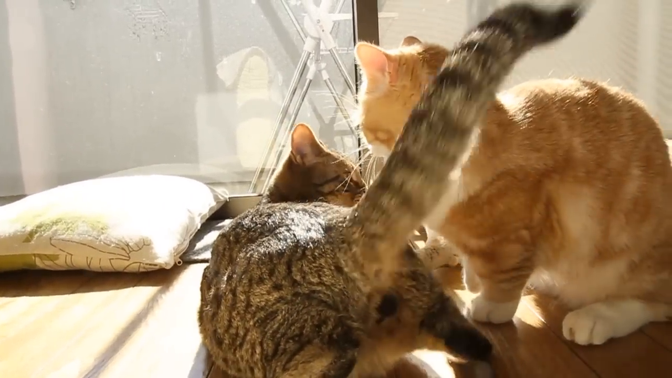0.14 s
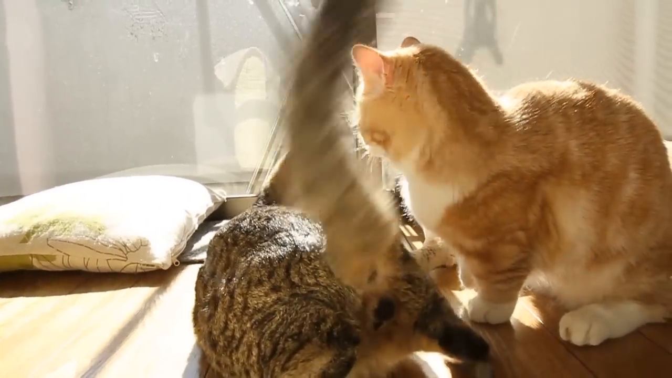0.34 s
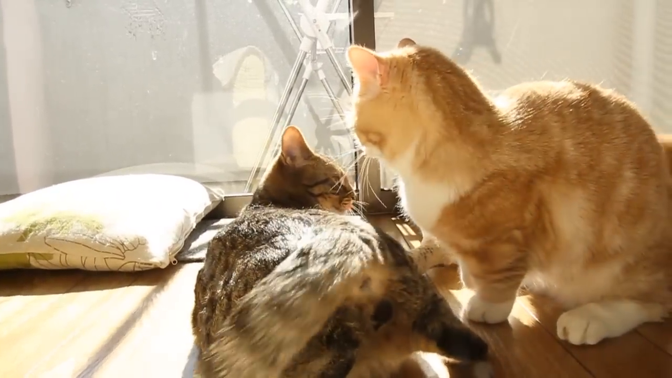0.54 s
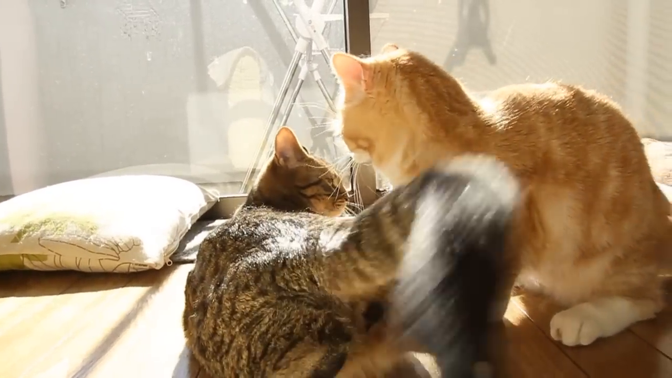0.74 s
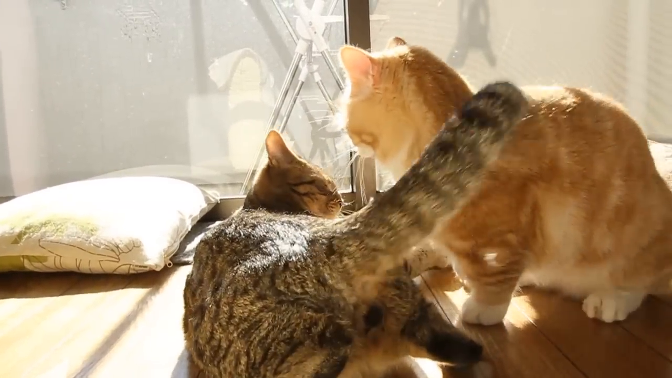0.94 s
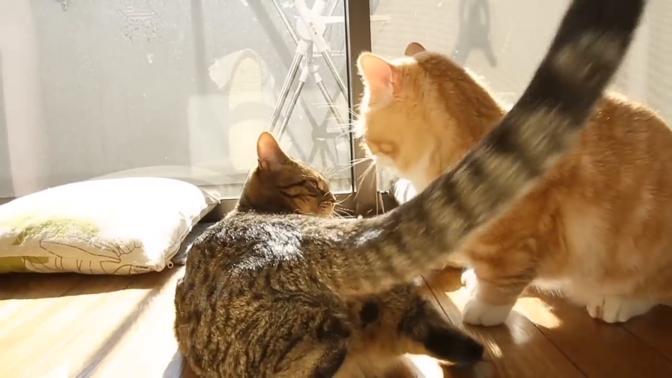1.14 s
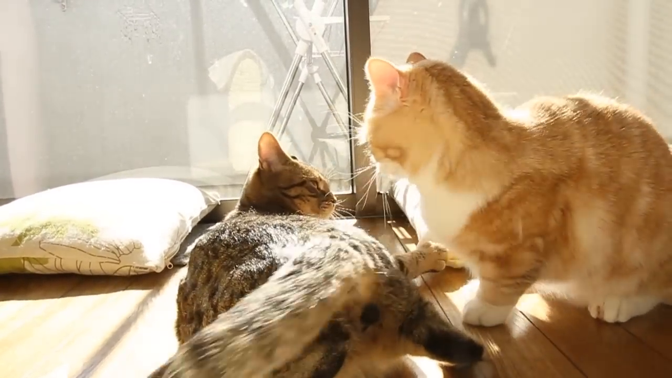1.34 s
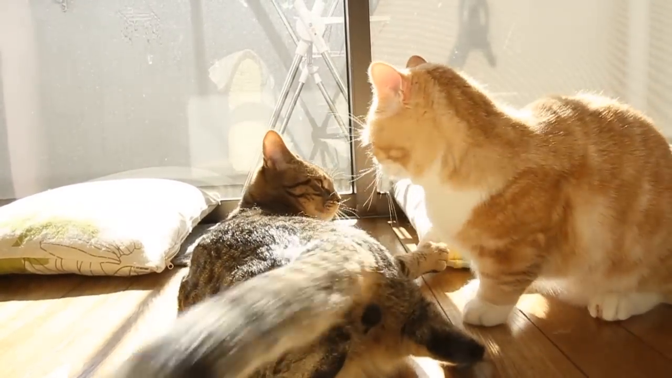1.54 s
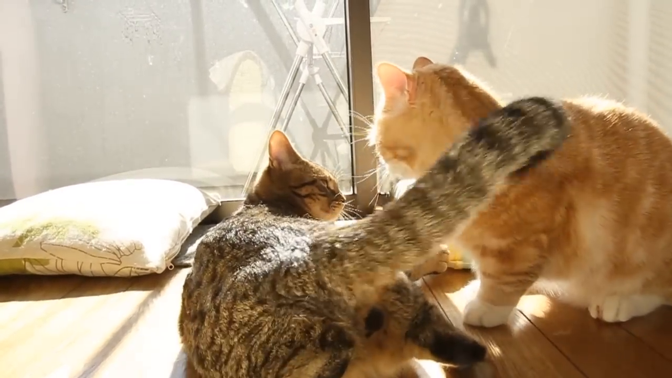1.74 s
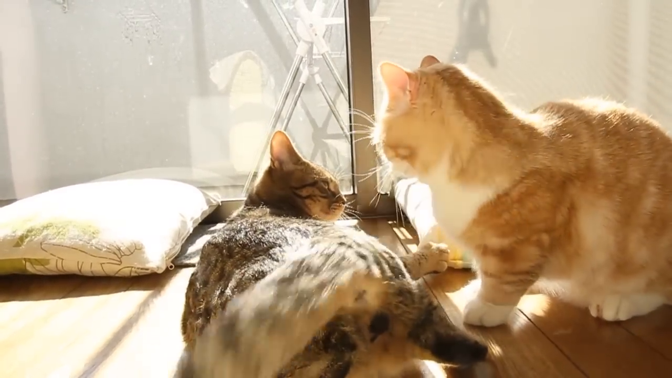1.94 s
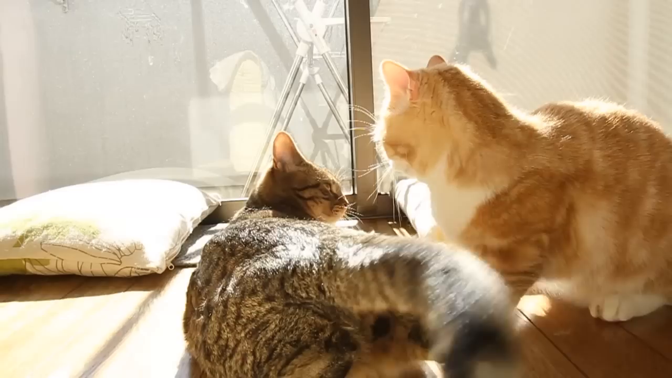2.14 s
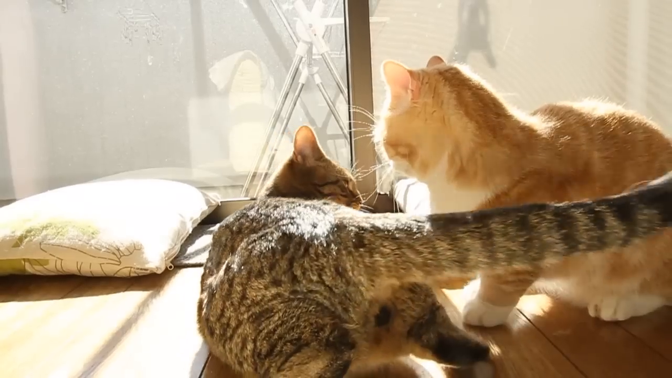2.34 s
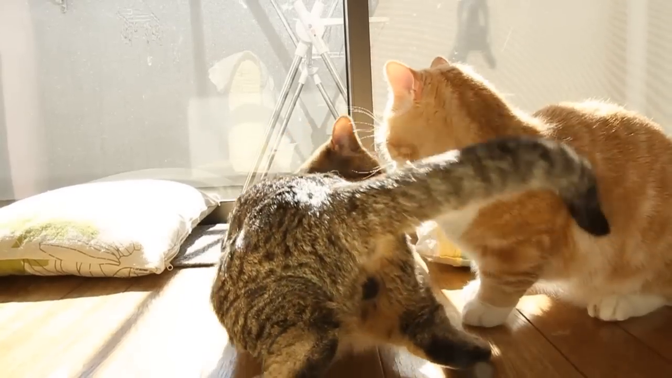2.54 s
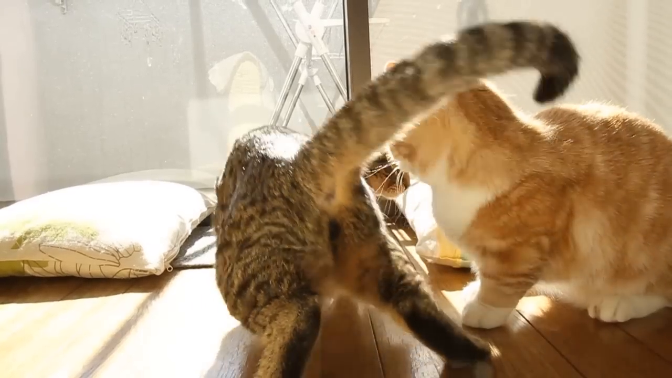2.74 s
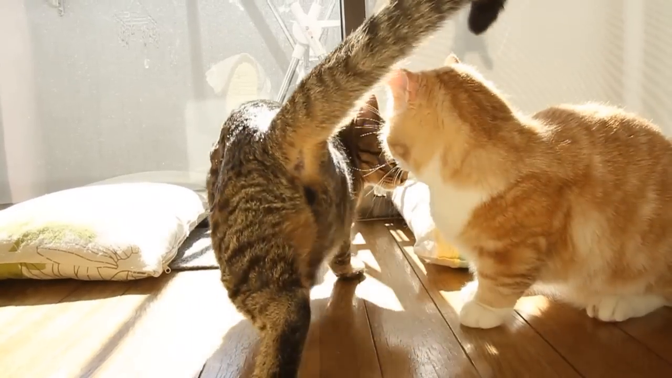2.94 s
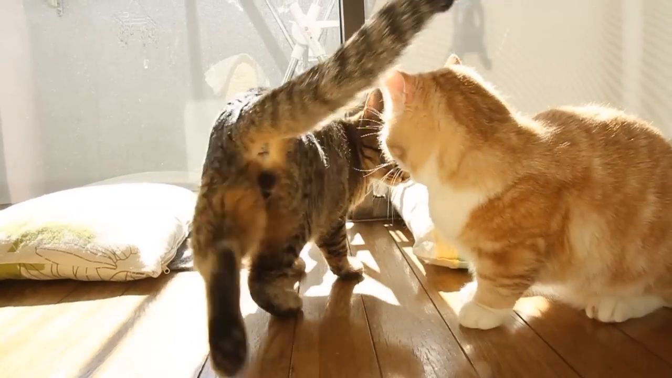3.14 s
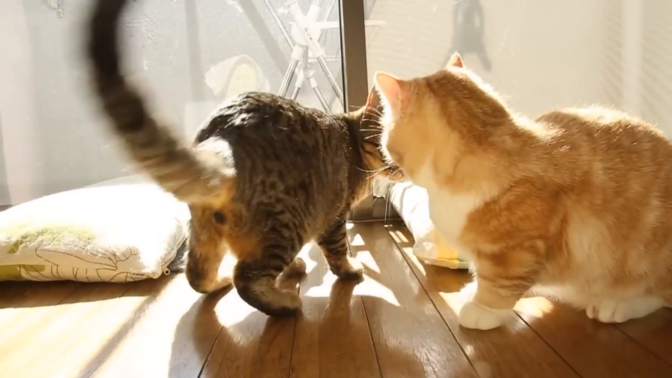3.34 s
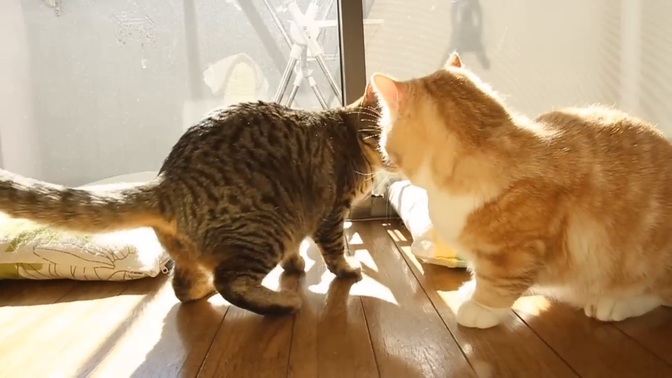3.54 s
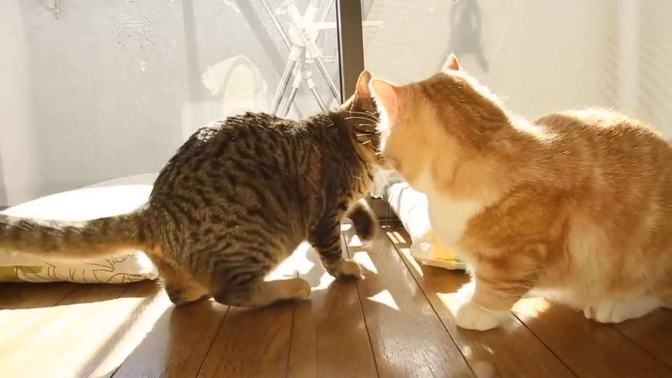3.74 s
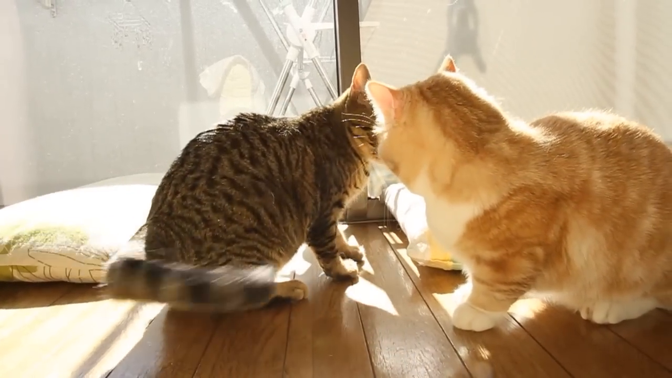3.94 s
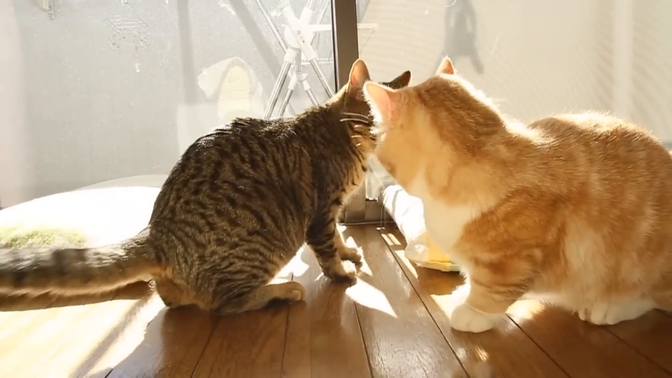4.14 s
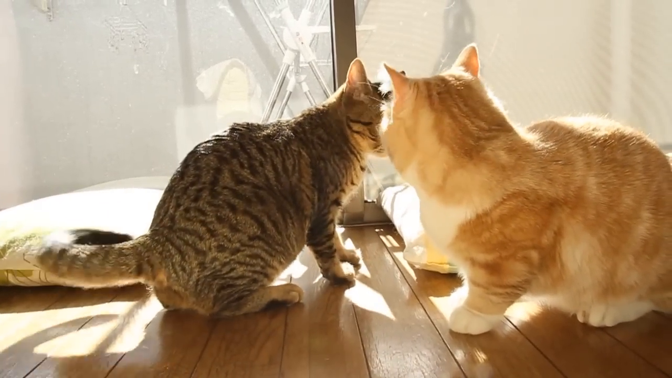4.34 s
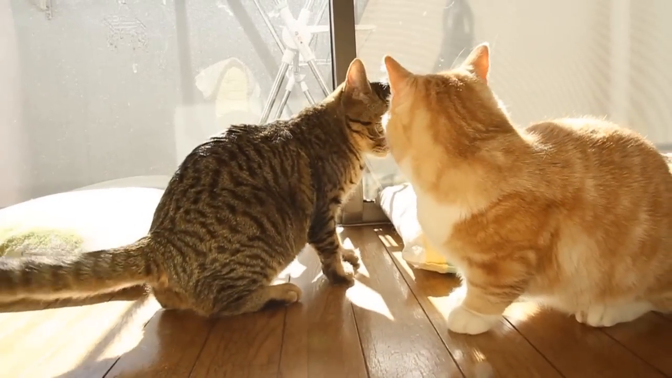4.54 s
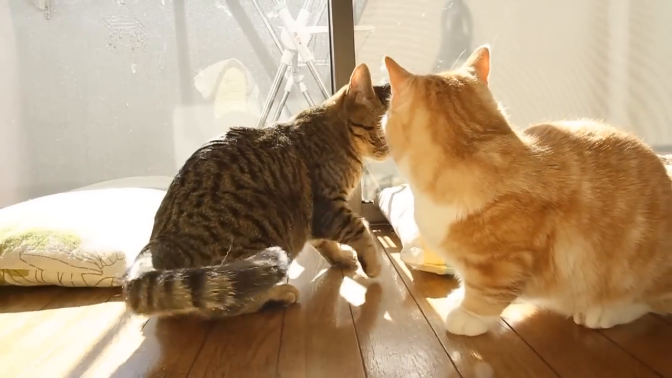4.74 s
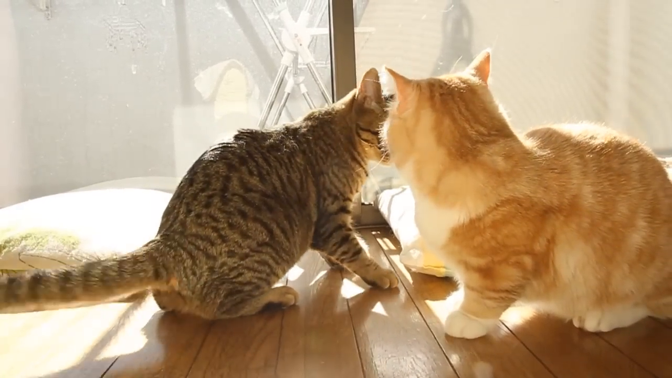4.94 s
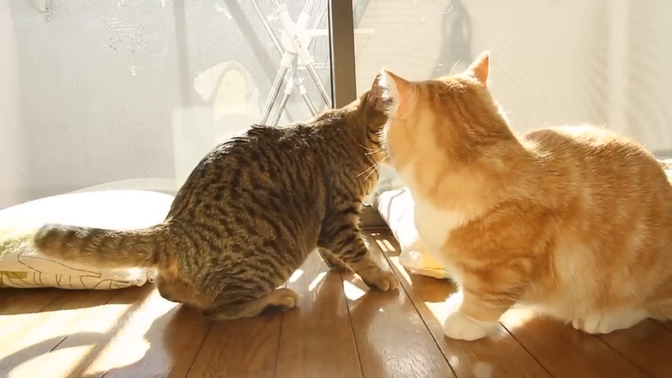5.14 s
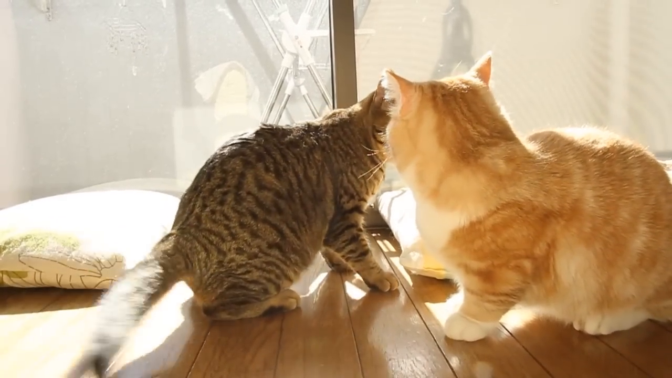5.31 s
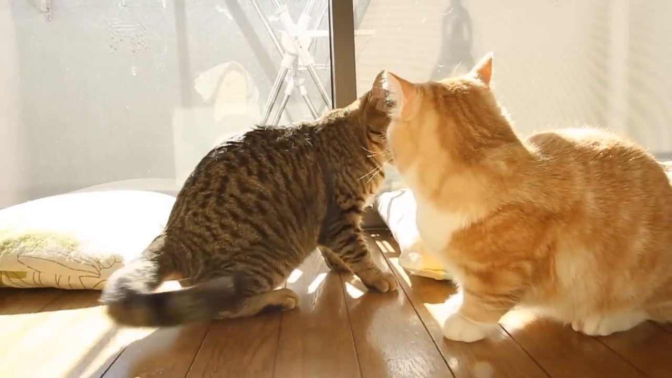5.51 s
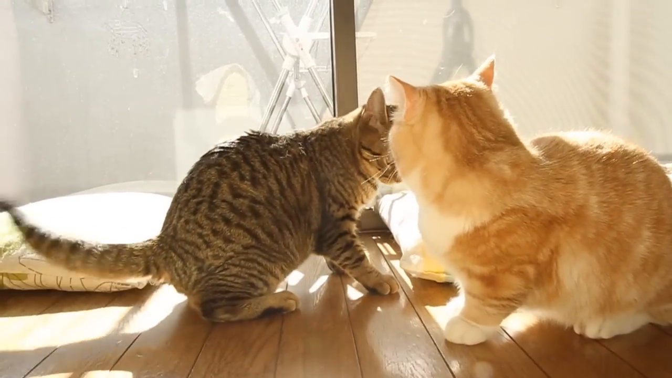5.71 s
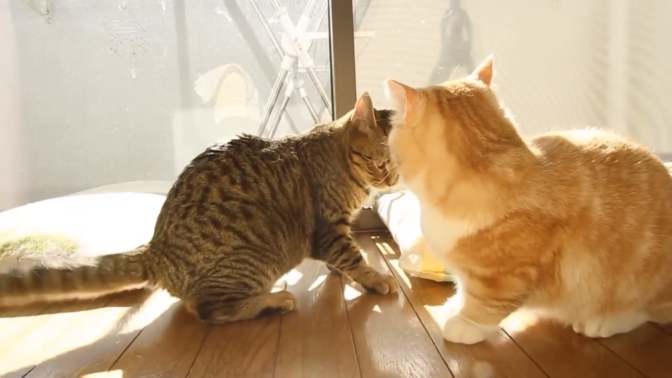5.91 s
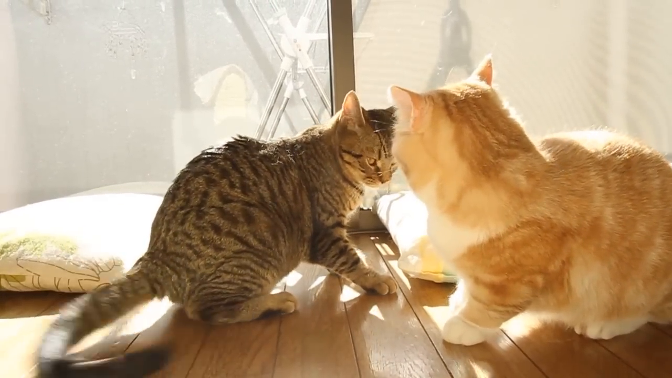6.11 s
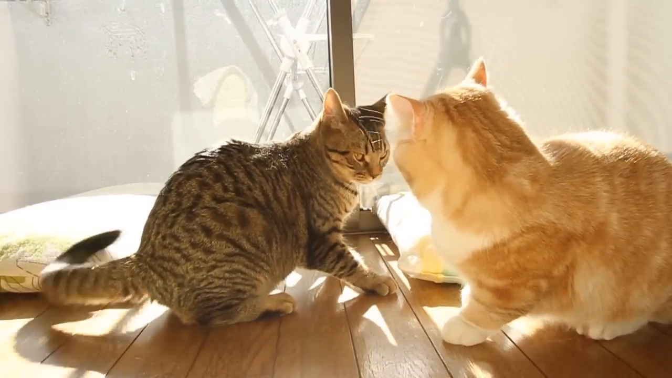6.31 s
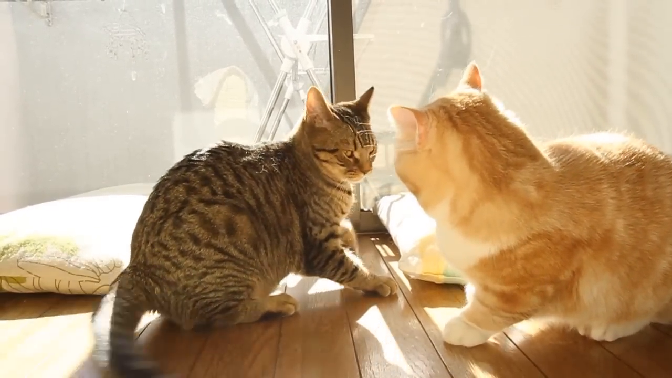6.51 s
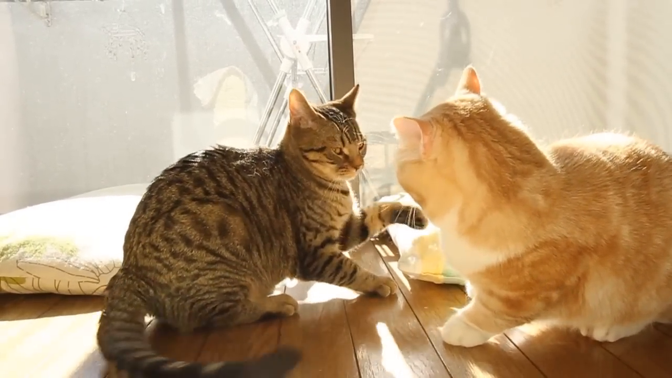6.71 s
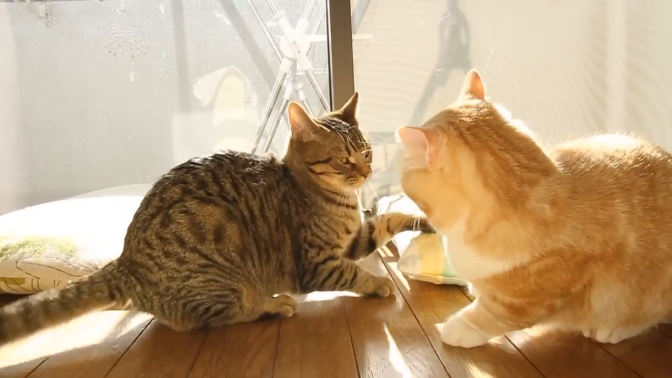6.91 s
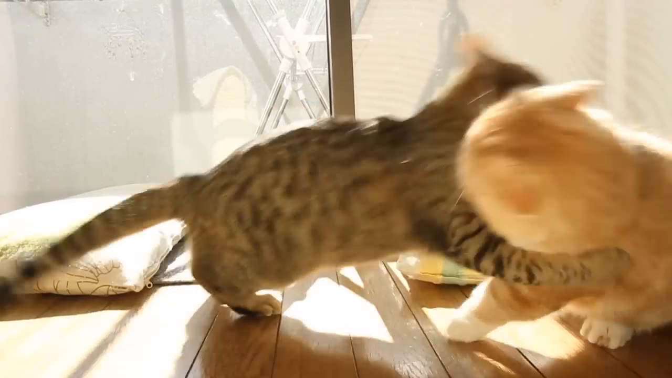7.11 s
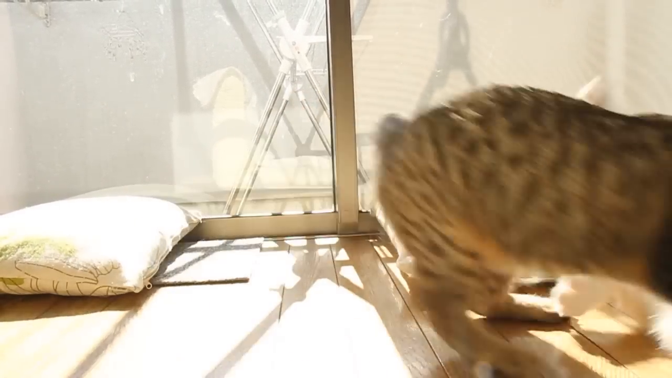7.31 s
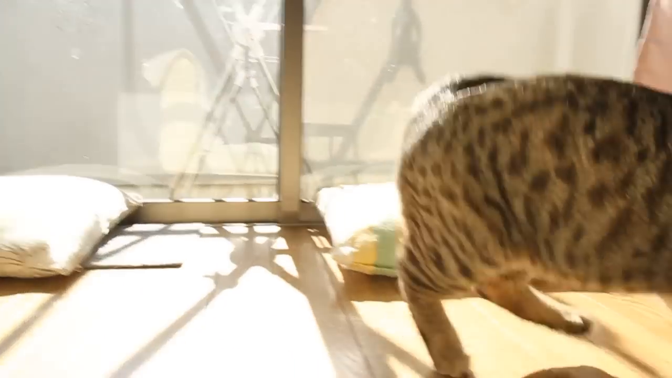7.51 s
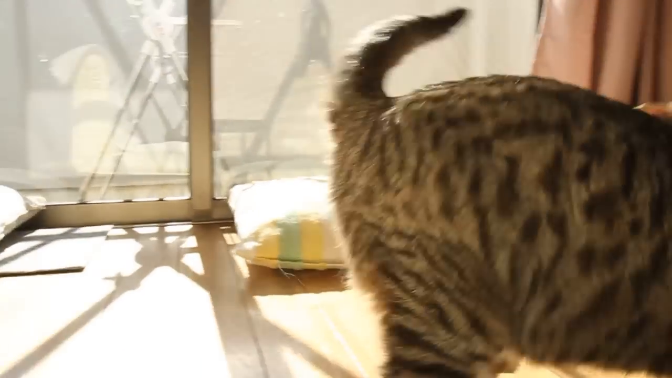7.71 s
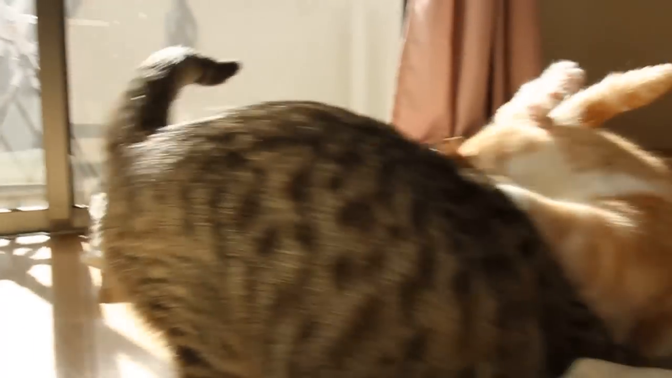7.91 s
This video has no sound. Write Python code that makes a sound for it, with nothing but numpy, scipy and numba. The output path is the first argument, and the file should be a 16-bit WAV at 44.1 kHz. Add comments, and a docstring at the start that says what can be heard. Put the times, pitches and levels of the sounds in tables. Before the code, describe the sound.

Two cats in a quiet humming room: tail slaps on floorboards, a pause, then skittering claws, tumbling thumps and a short harsh double yowl.

```python
"""In a small room with a wooden floor, where an appliance hums, two cats face off.
A tail slaps the boards and excites their damped modes; claws tick as filtered noise bursts.
Then paws skid as dense runs of tiny slips, bodies thump down on the same modes,
and one cat gives a short, harsh double cry: rough pulses and rasp through throat resonances.
Brushes of fur, one short claw skid and low rumbles are swells of band-limited noise."""
import sys
import numpy as np
from scipy import signal
from scipy.fft import rfft, irfft, next_fast_len
from scipy.io import wavfile
from scipy.ndimage import uniform_filter1d
from numba import njit

SR = 44100
rng = np.random.default_rng(int(sys.argv[2]) if len(sys.argv) > 2 else 0)


def store_pcm(level_fs):
    """Save levels as 16-bit WAV."""
    pcm = np.round(np.clip(level_fs, -1, 1) * 32767).astype(np.int16)
    wavfile.write(sys.argv[1], SR, np.atleast_2d(pcm).T)


N = 355446
TIME = np.arange(N) / SR

# Source levels apply before the room adds its echoes and tail.
# Mains hum of the appliance: (frequency [Hz], rms level [dB])
HUM = [(119.8, -52), (179.7, -61.5), (239.6, -60.5), (299.5, -63), (419.5, -55.5), (479.3, -59), (659, -69),
       (719, -64), (779, -59), (1018.7, -68)]
# Spectrum of the steady room noise: (frequency [Hz], relative density [dB per Hz])
AIR_SPECTRUM = [(25, -21), (55, -5.5), (85, -10), (125, -6), (160, -6), (300, -10.5), (450, -15.5),
                (600, -14), (900, -16.5), (1500, -17.5), (3000, -28.5), (6500, -32.5), (10000, -34),
                (16000, -37)]
AIR_DB = -49.5  # rms

# Floorboard modes: (frequency [Hz], level [dB], free ring time T60 [s])
BOARD_MODES = [(73.5, -9.5, 0.28), (106.7, -9, 0.2), (130, -3, 0.15), (165.6, 1, 0.094),
               (212.7, -5.5, 0.14), (262.6, -1.5, 0.096), (329, -10.5, 0.14), (380.5, 0.5, 0.051),
               (498, -5.5, 0.064), (622, -7, 0.093), (870, -11, 0.031), (970, -1, 0.011),
               (1239, 6.5, 0.024), (1623, 5, 0.026), (1990, 0, 0.052), (2453, 0, 0.05)]
# Softer contacts drive lower modes: lowest frequency as a share of the hardness, and its range
LOWEST_SHARE, LOWEST_MIN_HZ, LOWEST_MAX_HZ = 0.51, 82, 139.4
# Tail whips the floor: (time [s], peak level [dB], contact hardness [Hz])
TAIL_SLAPS = [(.3585, -10, 860), (1.886, -14.5, 860), (6.311, -20.5, 850)]
# Tail base or tip touches down before and after a slap: (time [s], peak level [dB])
TAIL_TOUCHES = [(0.3342, -24.5), (.5895, -22.5), (1.853, -19.5), (2.058, -27.5), (6.387, -31)]
# Ring settings are shares of the modes' free ring time
SLAP_RING, THUMP_RING = 0.93, 1.04
TOUCH_HARD_HZ, TOUCH_RING = 460, 0.42
REBOUND_S, REBOUND_DB = 0.01, -6.5  # the tail bounces once, lightly
# Fur smacks the varnish: level against the slap [dB], T60 [s], tilt [dB per octave]
SMACK_DB, SMACK_T60, SMACK_TILT_DB = -20.5, 0.056, -5.5
# Hair ticks in a light touch: level against the touch [dB], T60 [s], tilt [dB per octave]
HAIR_TICK_DB, HAIR_TICK_T60, HAIR_TILT_DB = -14, 0.04, 2

# Faint brushes of fur and one short claw skid, at 2.765 s:
# (time [s], rms level at the crest [dB], centre [Hz], length [s])
BRUSHES_AND_SKID = [(1.015, -53.5, 2150, 0.062), (2.55, -63, 14000, .03), (2.765, -51.5, 4700, 0.014),
                    (3.882, -57.5, 2720, .066), (4.374, -65, 7400, .043), (5.14, -61, 4000, 0.024)]
# Claws catch on the wood: (time [s], peak level [dB], brightness tilt [dB per octave])
CLAW_CATCHES = [(1.198, -39, 10), (2.723, -36, -6), (2.754, -31.5, -1), (3.061, -28, 2), (3.644, -40.5, 6),
                (4.471, -41, 6), (6.9264, -5, 0.5), (6.9971, -4.5, 2), (7.001, -5, 0.5), (7.012, 0, 1.5),
                (7.141, -20, 0), (7.156, -16, -4), (7.207, -10.5, 2), (7.271, -9, -1.5), (7.5169, -15.5, 7),
                (7.528, -19, 12)]
# Colour of a claw on varnished wood: (frequency [Hz], level [dB])
CLAW_COLOUR = [(200, -44), (700, -28), (1500, 7), (2400, 4), (3600, 11), (6000, 4.5), (9000, -3.5),
               (12500, -8.5), (15500, -13)]
CLAW_T60 = 0.038  # s
# Paws and bodies land; the last heavy thump booms on with a second bump:
# (time [s], peak level [dB], contact hardness [Hz])
THUMPS = [(1.458, -32.5, 230), (2.531, -38, 250), (2.926, -36.5, 353), (3.63, -37, 130), (4.539, -38, 120),
          (5.238, -20, 133), (6.304, -25.5, 187), (6.925, -19.5, 745), (6.997, -16, 800),
          (7.237, -13.5, 260), (7.2601, -12.5, 450), (7.2694, -9, 295), (7.321, -23, 450),
          (7.496, -25, 167), (7.516, -23, 168.6), (7.613, -13.5, 197.5), (7.69, -22, 458),
          (7.758, -12, 288), (8.008, -7.5, 202), (8.03, -13.5, 180)]
# Low rumbles as weight shifts: (time [s], rms level at the crest [dB], centre [Hz], length [s])
WEIGHT_SHIFTS = [(3.84, -45, 34, 0.11), (4.58, -49, 80, 0.095), (6.55, -52, 55.6, 0.12),
                 (6.9, -42, 123, 0.037), (7.06, -38, 110, .03), (7.215, -36, 190, 0.025)]

# Strokes of sliding paws and fur: (time [s], length [s], rms level [dB])
SLIDE_STROKES = [(6.919, 0.022, -32), (7.022, .012, -32), (7.158, 0.049, -29.5), (7.267, .025, -37),
                 (7.695, 0.011, -41.5)]
# Colour of the sliding: (frequency [Hz], level [dB])
SCUFFLE_COLOUR = [(120, 11), (300, 7.5), (800, 5.5), (1500, 4), (2600, 4), (5500, 2.5), (8500, -8),
                  (12000, -2), (15500, -17)]
STROKE_RISE_DB_PER_S, STROKE_FALL_DB_PER_S = 395, 217
TUSSLE_S, TUSSLE_DB = 6.9, -53  # from here on the coats keep rubbing

# Two yowls and a trailing growl: (time [s], length [s], rms level [dB],
# mouth opening at the start [0-1], roughness at the start [0-1], release [dB per s])
CALLS = [(7.338, .06, -15, 0, 0.39, 620), (7.485, 0.095, -20, 0.46, 0.23, 270),
         (7.666, 0.022, -35, .02, .62, 650)]
# Pitch of the two yowls, one list each: (time [s], pitch [Hz])
YOWL_PITCH = [
    [(7.343, 343.5), (7.353, 340.2), (7.365, 368.9), (7.389, 371.2), (7.403, 366.3), (7.419, 317),
     (7.44, 303)],
    [(7.49, 472.4), (7.504, 403), (7.52, 381), (7.538, 394.8), (7.552, 429.3), (7.574, 393.2), (7.6, 365.3)],
]
# The voice sinks to this: (time [s], pitch [Hz])
GROWL_END = (7.70, 295)
# Throat and mouth resonances: (centre with the mouth half open [Hz], width [Hz],
# level extrapolated to an opening of 1.5 [dB], gain from shut to wide open [dB])
THROAT = [(1090, 91, -3.5, -12), (1554, 100, 1.5, -14.5), (1795, 360, 1.5, -11), (2180, 460, 14, 14),
          (2470, 140, 7.5, 5), (2730, 82, -27, 18)]
# The lowest and highest resonances stand apart; same columns
LOW_THROAT = (337, 126, -13.5, -19.5)
HIGH_THROAT = (6592, 1000, -18, -14)
ATTACK_SHARE = 0.25  # of a call's length
MOUTH_OPENS_PER_S, MOUTH_WIDEST = 10.4, 0.92
# As a call dies away its roughness moves to this value: the yowls roughen, the growl eases slightly
ROUGHNESS_MOVES_S, DYING_ROUGHNESS = 0.03, 0.51
# The highest resonance comes out as the cat forces its voice [dB per dB]
FULL_EFFORT_DB, EFFORT_BRIGHTENS = -15.5, 0.72

# Decay of the room: (frequency [Hz], T60 [s])
ROOM_T60 = [(100, 0.72), (400, 0.44), (2000, 0.36), (6000, 0.4), (15000, 0.31)]
# Nearby glass, wall and ceiling: (delay [s], level before each group's echo offset [dB])
ECHOES = [(.0042, -15.5), (0.0103, -8.5), (0.0166, -10)]
CUTOFF_HZ = 16000


def from_db(db):
    """Logarithmic level: decibels become an amplitude ratio."""
    return 10 ** (np.asarray(db) / 20)


def rms_one(x):
    """Normalisation: scale to unit effective value."""
    return x / np.sqrt(np.mean(x ** 2) + 1e-20)


def at_hz(points, hz):
    """Interpolation: read a table along log frequency."""
    table_hz, value = np.transpose(points)
    return np.interp(np.log(hz + 1), np.log(table_hz), value)


def coloured(x, spectrum):
    """Spectral shaping: weight the spectrum of a noise and return it at unit rms."""
    size = next_fast_len(len(x))
    hz = np.arange(size // 2 + 1) * SR / size
    gain = from_db(at_hz(spectrum, hz))
    return rms_one(irfft(rfft(x, size) * gain, size)[:len(x)])


def cut(x, hz, kind, order=2):
    """Band limitation: a Butterworth filter."""
    hz = np.clip(hz, 10, 0.45 * SR)
    return signal.sosfilt(signal.butter(order, hz, kind, fs=SR, output="sos"), x)


def wobble(hz, size):
    """Random modulation: low-passed noise of unit spread."""
    settled = cut(rng.standard_normal(size + SR), hz, "low")[SR:]
    return rms_one(settled)


def add(track, s, sound, peak_db):
    """Superposition: lay a sound into a track at a given time and peak level."""
    at = int(s * SR)
    part = sound[:max(N - at, 0)]
    track[at:at + len(part)] += part * from_db(peak_db) / np.abs(sound).max()


def background(waver=0.05):
    """Steady sources: slightly wavering mains harmonics over even room noise."""
    hum = np.zeros(N)
    for hz, db in HUM:
        tone = np.sqrt(2) * np.sin(2 * np.pi * (hz * TIME + rng.random()))
        hum += from_db(db) * tone * (1 + waver * wobble(3, N))
    air = coloured(rng.standard_normal(N), AIR_SPECTRUM)
    return hum + from_db(AIR_DB) * air


def blow(hard_hz, free, spot_db=4.5, flutter_db=7, flutter_t60=0.073, slap_db=3, slap_hz=1500):
    """Modal excitation: soft contacts reach only low modes; one that stays down damps them."""
    t = TIME[:SR // 3]
    hz, level_db, t60 = np.transpose(BOARD_MODES)[:, :, None]
    modes = np.sin(2 * np.pi * hz * t) * from_db(level_db - 60 * t / (t60 * free))
    # the spot struck weights the modes
    spot_gain = from_db(spot_db * rng.standard_normal(len(BOARD_MODES)))
    ring = spot_gain @ modes
    # many weak modes merge into a noise
    crowd = rms_one(cut(rng.standard_normal(len(t)), [300, 3500], "band"))
    crowd = crowd * from_db(flutter_db - 60 * t / flutter_t60)
    lowest_hz = np.clip(LOWEST_SHARE * hard_hz, LOWEST_MIN_HZ, LOWEST_MAX_HZ)
    boards = cut(ring + crowd, hard_hz, "low", order=3)
    boards = cut(boards, lowest_hz, "high", order=4)
    # air squeezed out under the contact: one short pulse, stronger for hard blows
    rise = t * 2 * np.pi * slap_hz
    pulse = cut(rise * np.exp(-rise), 250, "high")
    slap = pulse * from_db(slap_db) * (hard_hz / slap_hz) ** 2
    return boards / np.abs(boards).max() + slap


def tick(t60, tilt_db, snap_db=7, snap_s=0.00097):
    """Impulsive contact: a sharp snap on varnish, then a brief noisy decay."""
    t = TIME[:SR // 10]
    fade = from_db(-60 * t / t60) + from_db(snap_db) * np.exp(-t / snap_s)
    colour = [(hz, db + tilt_db * np.log2(hz)) for hz, db in CLAW_COLOUR]
    grain = coloured(rng.standard_normal(len(t)), colour)
    level = np.sqrt(uniform_filter1d(grain ** 2, size=40) + 1e-9)
    return fade * grain / level


def tail():
    """Impact and rebound: the tail smacks the boards, or just touches them with a tick of hair."""
    out = np.zeros(N)
    for s, peak_db, hard_hz in TAIL_SLAPS:
        add(out, s, blow(hard_hz, SLAP_RING), peak_db)
        add(out, s, tick(SMACK_T60, SMACK_TILT_DB), peak_db + SMACK_DB)
        add(out, s + REBOUND_S, blow(TOUCH_HARD_HZ, TOUCH_RING), peak_db + REBOUND_DB)
    for s, peak_db in TAIL_TOUCHES:
        add(out, s, blow(TOUCH_HARD_HZ, TOUCH_RING), peak_db)
        add(out, s, tick(HAIR_TICK_T60, HAIR_TILT_DB), peak_db + HAIR_TICK_DB)
    return out


def swells(rows, width, rise_share, uneven_db=3.0):
    """Amplitude envelope: soft, uneven bands of noise that come faster than they go."""
    out = np.zeros(N)
    for s, db, hz, length in rows:
        noise = rms_one(cut(rng.standard_normal(N), [hz / width, hz * width], "band"))
        span = length * np.where(TIME < s, rise_share, 1 / rise_share)
        out += from_db(db) * noise * np.exp(-2 * ((TIME - s) / span) ** 2)
    return out * from_db(uneven_db * wobble(62, N))


def brushes_and_skid():
    """Light friction: brushing fur and one short claw skid give faint bands of noise."""
    return swells(BRUSHES_AND_SKID, width=1.33, rise_share=0.78)


def claws():
    """Stick and release: each claw catches and lets go with a tick."""
    out = np.zeros(N)
    for s, peak_db, tilt_db in CLAW_CATCHES:
        add(out, s, tick(CLAW_T60, tilt_db), peak_db)
    return out


def thumps():
    """Impact: paws and bodies set the board modes ringing; a second bump prolongs the last heavy thump."""
    out = np.zeros(N)
    for s, peak_db, hard_hz in THUMPS:
        add(out, s, blow(hard_hz, THUMP_RING), peak_db)
    return out


def rumbles():
    """Slow loading: shifting weight gives low bands of noise."""
    return swells(WEIGHT_SHIFTS, width=1.47, rise_share=0.96)


def scuffle(spread_db=0.5):
    """Stick-slip friction: a dense run of uneven tiny slips, in strokes that swell, hold and fade."""
    grains_per_s, bunch_db, bunch_hz = 3500, 4, 90
    strokes_db = []
    for s, length, db in SLIDE_STROKES:
        before = np.maximum(s - TIME, 0)
        after = np.maximum(TIME - (s + length), 0)
        strokes_db.append(db - STROKE_RISE_DB_PER_S * before - STROKE_FALL_DB_PER_S * after)
    rubbing = from_db(TUSSLE_DB) * (TIME > TUSSLE_S)
    level = np.maximum(from_db(np.max(strokes_db, axis=0)), rubbing)
    # the slips come in bunches
    chance = grains_per_s * from_db(bunch_db * wobble(bunch_hz, N)) / SR
    slipping = rng.random(N) < chance
    size = from_db(spread_db * np.minimum(rng.exponential(1, N), 4))
    slips = slipping * rng.choice([-1, 1], N) * size
    return level * coloured(slips, SCUFFLE_COLOUR)


@njit
def resonate(x, hz, width, sr):
    """Resonance: a two-pole filter whose centre moves; gain 1 on top."""
    y, r = np.zeros(len(x)), np.exp(-np.pi * width / sr)
    for i in range(2, len(x)):
        drive = (1 - r * r) / 2 * (x[i] - x[i - 2])
        y[i] = drive + 2 * r * np.cos(2 * np.pi * hz[i] / sr) * y[i - 1] - r * r * y[i - 2]
    return y


def throat(pitch, mouth, rough, strain, lift=0.046, rasp=0.94, low_edge_hz=900, high_edge_hz=3000):
    """Source and filter: uneven fold pulses and rasp ring the throat, here at an even level."""
    jitter, shimmer, flutter_hz = 0.11, 0.75, 200
    size = len(pitch)
    # cycle-to-cycle jitter smears the high harmonics and leaves the low ones clear
    unsteady = rms_one(cut(wobble(flutter_hz, size), 50.5, "high"))
    phase = 2 * np.pi * np.cumsum(pitch * (1 + jitter * rough * unsteady)) / SR
    pulses = rms_one(sum(np.cos(k * phase) for k in range(1, 36)))
    breath = rng.standard_normal(size) * (1 + np.cos(phase))
    puffs = rms_one(cut(breath, 1200, "high", order=1))
    voiced = pulses * (1 - rough) * (1 + shimmer * rough * wobble(flutter_hz, size))
    source = voiced + rasp * rough * puffs
    # the opening mouth lifts and brightens the resonances
    resonances = []
    for hz, width, db, gain_db in [LOW_THROAT, *THROAT, HIGH_THROAT]:
        centre = hz * (1 + lift * (mouth - 0.5))
        gain = from_db(db + gain_db * (mouth - 1.5))
        resonances.append(gain * resonate(source, centre, float(width), SR))
    low, *main, high = resonances
    # deep valleys lie on both sides of the main resonances
    voice = cut(cut(sum(main), low_edge_hz, "high"), high_edge_hz, "low", order=5)
    voice = voice + cut(low, 810, "low") + strain * cut(high, 7800, "low")
    return voice / np.sqrt(uniform_filter1d(voice ** 2, size=400) + 1e-12)


def cry():
    """Phonation: calls swell and hold as the mouth opens, then fade; yowls roughen, the growl eases."""
    out, t = np.zeros(N), TIME[:SR // 4]
    points = [point for call in YOWL_PITCH for point in call] + [GROWL_END]
    pitch = np.interp(TIME, *np.transpose(points))
    for s, length, db, opening, roughness, release_db_per_s in CALLS:
        at = int(s * SR)
        on = slice(at, at + len(t))
        dying = np.maximum(t - length, 0)
        effort = from_db(db) * (1 - np.exp(-(t / (ATTACK_SHARE * length)) ** 2))
        strain = (effort / from_db(FULL_EFFORT_DB)) ** EFFORT_BRIGHTENS
        mouth = np.minimum(opening + MOUTH_OPENS_PER_S * t, MOUTH_WIDEST)
        rough = np.interp(dying, [0, ROUGHNESS_MOVES_S], [roughness, DYING_ROUGHNESS])
        level = effort * from_db(-release_db_per_s * dying)
        out[on] += level * throat(pitch[on], mouth, rough, strain)
    return out


def room(x, tail_db, echo_db, build_s=0.0076):
    """Reverberation: direct sound, near echoes and a diffuse tail with its own decay in each band."""
    t = TIME[:SR // 2]
    edges = np.geomspace(50, 18000, 10)
    diffuse = np.zeros(len(t))
    for low, high in zip(edges, edges[1:]):
        band = cut(rng.standard_normal(len(t)), [low, high], "band")
        diffuse += band * from_db(-60 * t / at_hz(ROOM_T60, np.sqrt(low * high)))
    diffuse *= 1 - np.exp(-(t / build_s) ** 2)
    response = from_db(tail_db) * diffuse / np.sqrt(np.sum(diffuse ** 2))
    response[0] += 1
    for delay, db in ECHOES:
        response[int(delay * SR)] += from_db(db + echo_db)
    return signal.fftconvolve(x, response)[:N]


def scene():
    """Superposition: floor, paws and voice share the room; rumbles and background bypass it."""
    floor = room(tail() + thumps(), tail_db=-11.5, echo_db=-7) + rumbles()
    paws = room(claws() + scuffle() + brushes_and_skid(), tail_db=-11.5, echo_db=-7)
    voice = room(cut(cry(), 200, "high"), tail_db=-7, echo_db=2.5)
    return (floor + paws + voice + background())[None]


def record(dry):
    """Band limitation: an elliptic low-pass cuts the top steeply."""
    low_pass = signal.ellip(10, 0.2, 80, CUTOFF_HZ, fs=SR, output="sos")
    return signal.sosfilt(low_pass, dry)


dry = scene()
out = record(dry)
store_pcm(out)
```